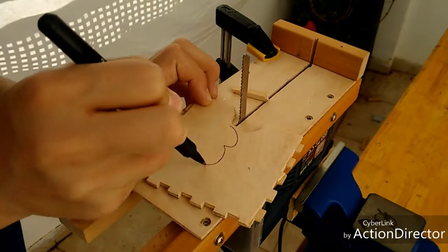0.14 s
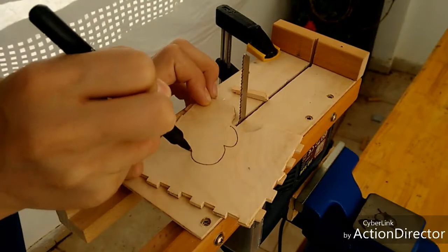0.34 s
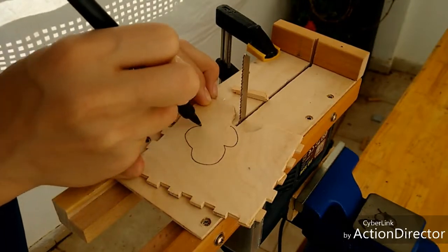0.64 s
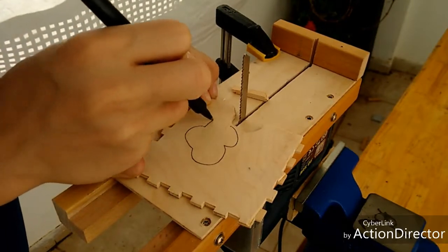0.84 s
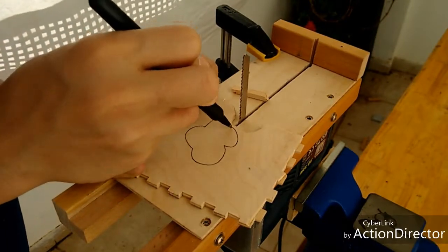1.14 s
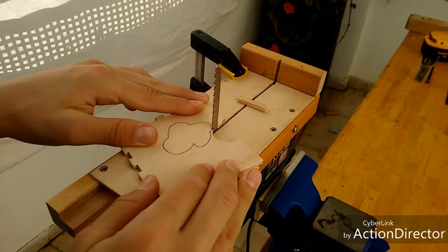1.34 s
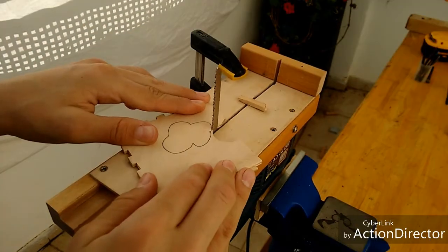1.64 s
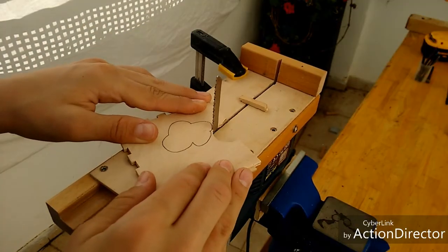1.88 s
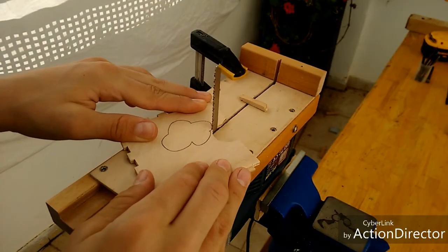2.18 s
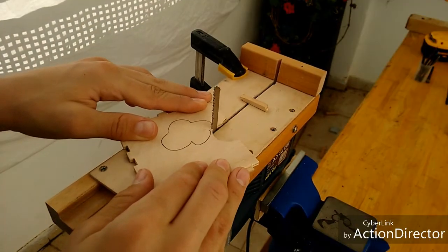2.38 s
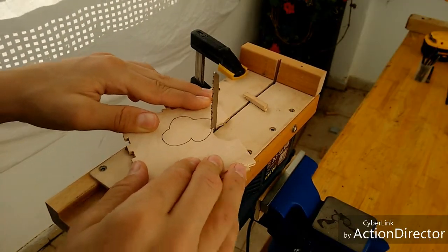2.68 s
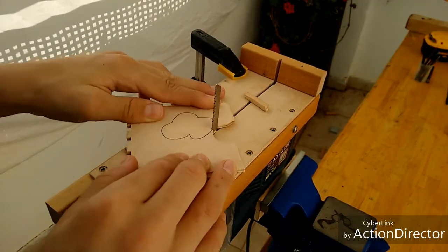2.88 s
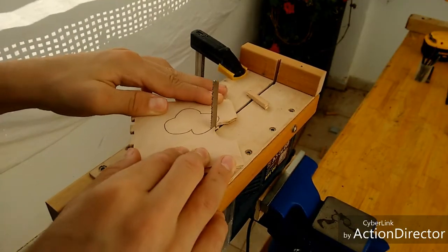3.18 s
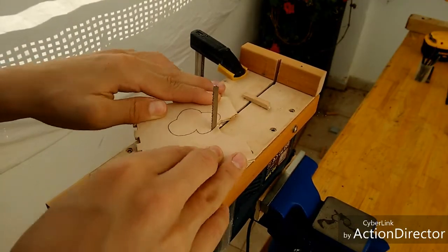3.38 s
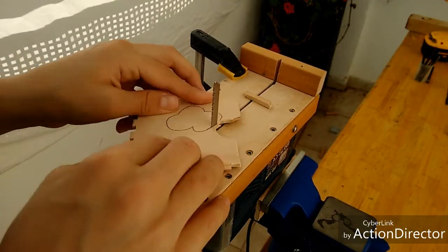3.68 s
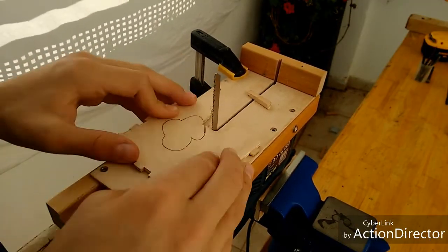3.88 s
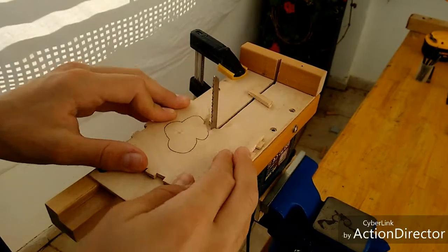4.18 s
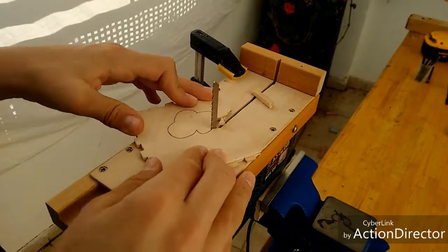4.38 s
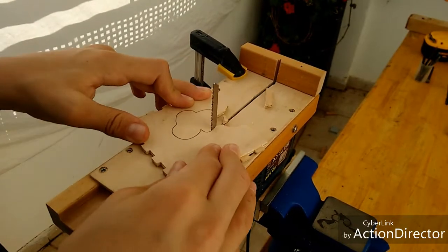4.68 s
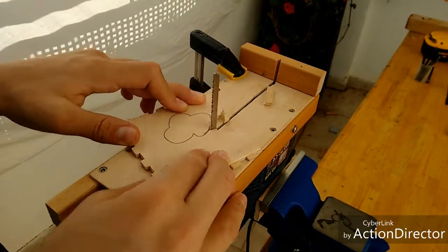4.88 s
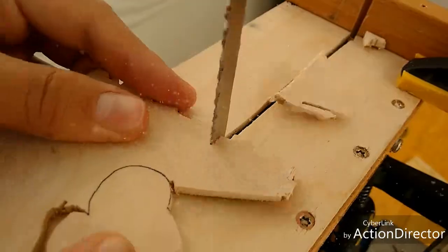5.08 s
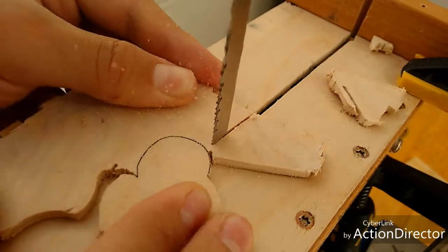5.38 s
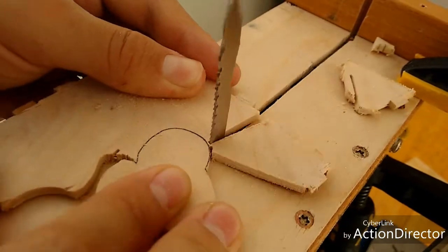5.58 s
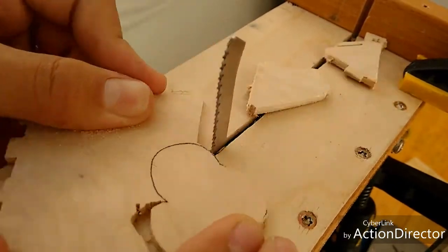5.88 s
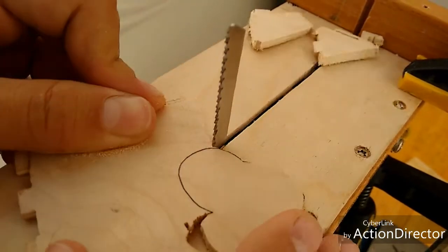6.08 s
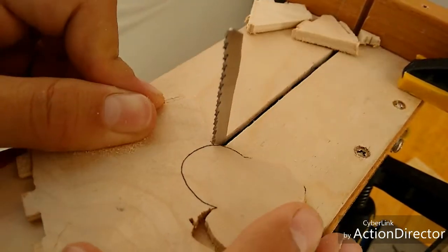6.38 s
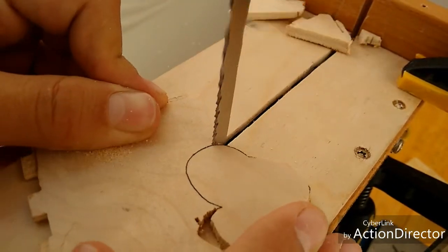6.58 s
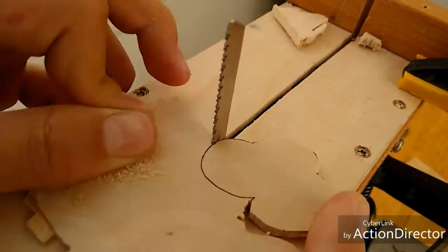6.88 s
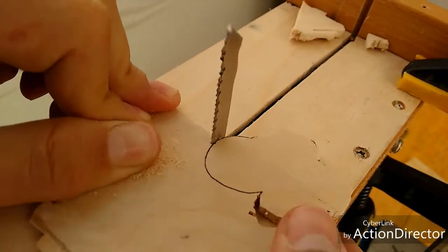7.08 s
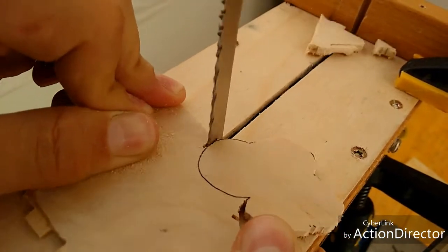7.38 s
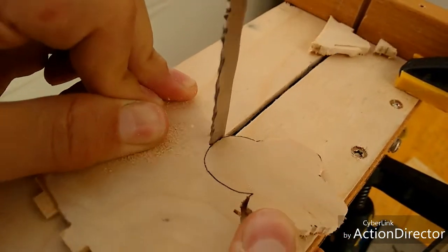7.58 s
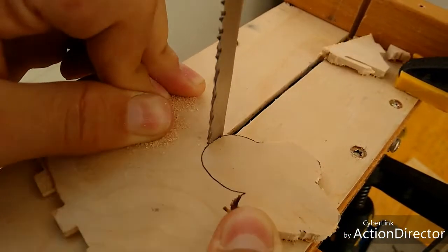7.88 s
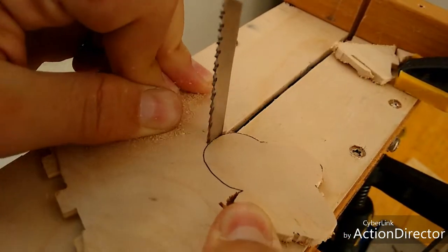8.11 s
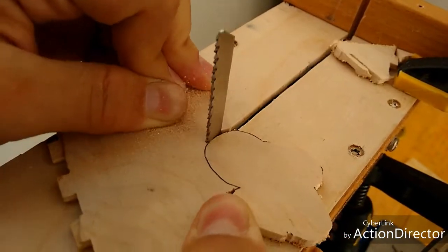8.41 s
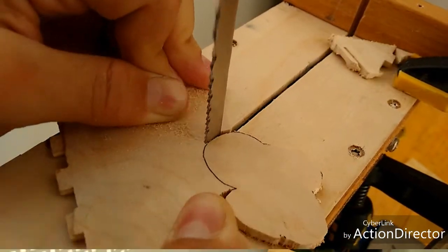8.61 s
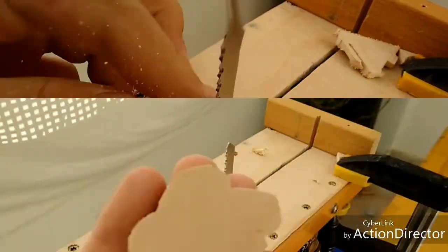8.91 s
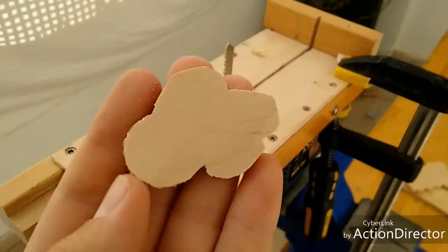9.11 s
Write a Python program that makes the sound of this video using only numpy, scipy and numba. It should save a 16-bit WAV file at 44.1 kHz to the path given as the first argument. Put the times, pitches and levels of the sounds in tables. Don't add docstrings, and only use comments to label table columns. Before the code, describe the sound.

Stereo phone microphone beside a table-mounted jigsaw. First come light pen ticks and thin squeaks over room air, then a steady woody rattle at natural speed. An abrupt change gives hurried sawing, a harsh buzz bending under load. The last cuts are nearer and louder, with nasal plywood ring, gritty teeth and sharp jams, before sudden near-silence with a thin insect shimmer outside.

```python
import sys
import numpy as np
from scipy import signal
from scipy.fft import rfft, irfft
from scipy.io import wavfile
from scipy.ndimage import uniform_filter1d
from numba import njit

SR = 44100
rng = np.random.default_rng(int(sys.argv[2]) if len(sys.argv) > 2 else 0)


def ratio_of_db(decibels):
    return 10 ** (np.asarray(decibels, float) / 20)


def log_audio(samples):
    frames = np.atleast_2d(samples).T
    limited = np.clip(frames, -1, 1)
    pcm = np.round(limited * 32767).astype(np.int16)
    wavfile.write(sys.argv[1], SR, pcm)


N = 407925


def unit(x):
    return x / np.sqrt(np.mean(x ** 2))


def colour(x, points, modes=(), lo_hz=1., hi_hz=1e5, turn=0.):
    hz = np.maximum(np.fft.rfftfreq(4096, 1 / SR), 1)
    point_hz, point_db = np.array(points).T
    db = np.interp(np.log(hz), np.log(point_hz), point_db)
    db = db + sum(gain / (1 + (2 * (hz - f) / width) ** 2) for f, width, gain in modes)
    band_loss = (1 + (lo_hz / hz) ** 12) * (1 + (hz / hi_hz) ** 12)
    db = np.maximum(db - 10 * np.log10(band_loss), -120)
    ceps = irfft(db * np.log(10) / 20)
    ceps[1:2048] *= 2
    ceps[2049:] = 0
    taps = np.roll(irfft(np.exp(rfft(ceps) + 1j * turn)), 64)
    return signal.fftconvolve(x, taps)[64:64 + len(x)]


def walk(size, rate):
    k = int(SR / rate)
    held = np.repeat(rng.standard_normal(size // k + 1), k)
    return uniform_filter1d(held, k)[:size]


def band_noise(size, hz, width):
    sos = signal.butter(2, [hz - width / 2, hz + width / 2], "band", fs=SR, output="sos")
    return signal.sosfilt(sos, rng.standard_normal(size))


# start in seconds, end in seconds, level in dB, side level in dB.
SHOP = [
    (0, 1.257, -46.5, -5),
    (8.951, 9.3, -47.5, -5.5),
]
# frequency in Hz, density in dB per Hz.
SHOP_MID = [
    [(24, -60.5), (40, -37), (109, -11), (497, -12.5), (638, -10), (861, -8.5), (975, -7), (1610, -8),
     (2170, -7.5), (3310, -8.5), (7930, -25), (9210, -32.5), (15600, -28.5)],
    [(15, -35.5), (25, -11), (156, -9.5), (496, -3), (921, -9.5), (1080, -9.5), (1170, -11), (1760, -27),
     (6500, -37.5), (8500, -34.5), (12200, -39), (14000, -38), (15600, -35.5)],
]
# frequency in Hz, density in dB per Hz.
SHOP_SIDE = [
    [(15, -35), (25, -6.5), (1080, -5.5), (1240, -4), (2120, -2), (4390, -16.5), (7520, -11.5),
     (15600, -30)],
    [(15, -37), (25, -9.5), (340, -5), (632, -6.5), (1080, -20), (2070, -12), (3350, -30), (15600, -31)],
]


def shop():
    out = np.zeros((2, N))
    for (start, end, db, side_db), mid, side in zip(SHOP, SHOP_MID, SHOP_SIDE):
        i, j = int(start * SR), min(int(end * SR), N)
        air = [unit(colour(rng.standard_normal(j - i), c)) for c in (mid, side)]
        swell_db = 0.16 * walk(size=j - i, rate=1.5) + 0.5 * walk(size=j - i, rate=19.0)
        out[:, i:j] = ratio_of_db(db + swell_db) * np.array([air[0], ratio_of_db(side_db) * air[1]])
    return out


# time in seconds, peak in dB, pitch in Hz, t60 in seconds.
TAPS = [
    (0.1316, -46, 2920, 0.021),
    (0.215, -33, 4260, 0.033),
    (0.2398, -30, 2700, 0.0097),
    (0.408, -39.5, 2300, 0.012),
    (0.7235, -41, 3500, .006),
    (0.759, -29, 3750, 0.025),
    (1.051, -31.5, 3750, 0.029),
]
# start in seconds, end in seconds, pitch in Hz, width in Hz, level in dB.
SQUEAKS = [
    (.225, .29, 2720, 130, -46),
    (.125, .165, 2920, 120, -52),
    (.12, .18, 2080, 150, -54),
    (.97, 1.22, 7350, 200, -62),
    (.83, .87, 4700, 300, -56),
    (.85, .96, 1850, 130, -54),
    (.99, 1.04, 2780, 120, -54),
    (.39, .45, 2200, 250, -54),
    (1.0, 1.07, 1900, 150, -56),
]


def pen():
    out, t = np.zeros(N), np.arange(4000) / SR
    for s, db, hz, t60 in TAPS:
        i = int(s * SR)
        crack = rng.standard_normal(len(t))
        strike = .5 * np.sin(2 * np.pi * hz * t) + .2 * np.gradient(crack) + .25 * crack
        out[i:i + len(t)] += ratio_of_db(db) * strike * 1000. ** (-t / max(t60, .004))
    for start, end, hz, width, db in SQUEAKS:
        i, j = int(start * SR), int(end * SR)
        rub = unit(band_noise(j - i, hz, width))
        out[i:j] += ratio_of_db(db + 5.0) * rub * signal.windows.tukey(j - i, .5)
    return np.array([out, 0.16 * out])


INERTIA_S = .03
GRIP_S, RETURN_SHARE = 0.0017, 0.57


def hands(t, pace, layers, moves):
    feed_db, bind_db = np.zeros((2, len(t)))
    for start, length, feed, bind in moves:
        fade = max(length * np.clip(RETURN_SHARE, .05, 1), GRIP_S)
        hold = np.clip(np.minimum((t - start) / GRIP_S, (start + length - t) / fade), 0, 1)
        feed_db = feed_db + feed * hold
        bind_db = bind_db + bind * hold
    hz = np.interp(t, *np.transpose(pace))
    hz = uniform_filter1d(hz, int(INERTIA_S * SR), mode="nearest")
    sag = 1 - hz / hz.mean()
    rasp_db, ring_db, drum_db = (db + share * feed_db + labour_db * sag for db, share, labour_db in layers)
    return hz, rasp_db + bind_db, ring_db, drum_db


@njit
def again(x, lag, share):
    y = np.sqrt(1 - share * share) * x
    for i in range(len(x)):
        if i >= lag[i]:
            y[i] += share * y[i - lag[i]]
    return y


def teeth(phase, bite):
    sharp, back_db, steady_db, share = bite
    size = len(phase)
    count = np.arange(size)
    grit = rng.standard_normal(size) * ratio_of_db(.8 * rng.exponential(size=size))
    stroke_before = np.interp(phase - 1, phase, count, left=-1)
    lag = np.round(count - stroke_before).astype(np.int64)
    grit = again(grit, lag, float(np.clip(share, 0, .97)))
    swing = np.cos(2 * np.pi * phase)
    half = np.floor(2 * phase + .5).astype(int)
    force = ratio_of_db(1.3 * rng.standard_normal(size))[half - half[0]]
    strokes = force * (np.exp(sharp * (swing - 1)) + ratio_of_db(back_db) * np.exp(-sharp * (swing + 1)))
    steady = .6 * grit + rng.standard_normal(size)
    return grit * strokes + ratio_of_db(steady_db) * steady


GEAR_LAG, GEAR_SIDE = .08, .3


def gearing(phase, gears, hz, modes, drum_hz, rattle_db, sway_db, slip=.3):
    mid, side = 0, 0
    for order, db in gears:
        angle = 2 * np.pi * order * (phase - GEAR_LAG) + slip * walk(size=len(phase), rate=hz.mean() / 3)
        lift_db = 1.9 * sum(gain / (1 + ((order * hz - f) / width) ** 2) for f, width, gain in modes)
        knock_db = rattle_db * (order * hz.mean() > drum_hz)
        sway = sway_db * walk(size=len(phase), rate=hz.mean() / 4)
        size = np.sqrt(2) * ratio_of_db(db + lift_db - lift_db.mean() + knock_db + sway)
        mid = mid + size * np.cos(angle)
        side = side + GEAR_SIDE * size * np.sin(angle)
    return np.array([mid, side])


KNOCK_RISE_S, KNOCK_SHARE, LOW_KNOCK_SHARE = .005, .95, .35
SING_DB = 6


def saw(pace, layers, moves, mid, side, modes, bites, setting, gears, spells=(), knocks=((0, 0),), sway_db=3):
    s = np.transpose(pace)[0]
    ring_hz, drum_hz, first, side_db, shared, turn = setting
    span = slice(int(s[0] * SR), int(s[-1] * SR))
    t = np.arange(N)[span] / SR
    hz, rasp_db, ring_db, drum_db = hands(t, pace, layers, moves)
    knock_db = np.interp(t - KNOCK_RISE_S, *np.transpose(knocks))
    knock_db = KNOCK_SHARE * (knock_db - knock_db.mean())
    ring_db = ring_db + knock_db
    drum_db = drum_db + LOW_KNOCK_SHARE * knock_db
    rattle_db = (1 - LOW_KNOCK_SHARE) * knock_db
    phase = np.cumsum(hz) / SR - (first - s[0]) * hz[0]
    bands = [(ring_hz, 1e5), (drum_hz, ring_hz), (1., drum_hz)]
    mix = np.clip(shared, 0, 1)
    mids, sides = [], []
    for bite, band in zip(bites, bands):
        push, other = teeth(phase, bite), teeth(phase, bite)
        mids.append(colour(push, mid, modes, *band))
        spread = mix * push + np.sqrt(1 - mix ** 2) * other
        sides.append(colour(spread, side, (), *band, turn))
    match = ratio_of_db(side_db) * np.std(sum(mids)) / np.std(sum(sides))
    out = np.zeros((2, N))
    sing = ratio_of_db(drum_db + SING_DB * (hz / hz.mean() - 1.5))
    out[:, span] = sing * gearing(phase, gears, hz, modes, drum_hz, rattle_db, sway_db)
    out[:, span] += chatter(t, phase, hz, spells)
    for m, d, db in zip(mids, sides, (rasp_db, ring_db, drum_db)):
        flutter = ratio_of_db(db + .8 * walk(size=len(hz), rate=25))
        out[:, span] += flutter * np.array([m, match * d]) / np.std(m)
    return out


# time in seconds, strokes per second.
SLOW_PACE = [(1.261, 23.15), (1.66, 23.12), (1.8, 22.7), (2.0, 22.63), (2.509, 22.62)]
# level in dB, share of feed change (0-1 or more), dB per unit of motor sag.
SLOW_LAYERS = [
    (-28.5, 0.74, 14),
    (-27.5, 1.5, -8),
    (-30.5, 0.72, 0),
]
# start in seconds, length in seconds, feed in dB, extra rasp of a binding blade in dB.
SLOW_HANDS = [
    (1.27, 0.15, 2.5, -1),
    (1.617, 0.3, 1, 1.5),
    (1.783, 0.18, -0.5, 1),
]
# frequency in Hz, density in dB per Hz.
SLOW_MID = [(18, -57), (30, -46), (152, -45), (243, -34.5), (432, -17), (657, -24.5), (923, 1),
            (1020, -4.5), (1330, -4), (2430, -32.5), (3150, -25.5), (4790, -29), (8520, -28),
            (13300, -35.5), (15600, -45.5)]
# frequency in Hz, density in dB per Hz.
SLOW_SIDE = [(18, -73), (30, -41), (284, -23.5), (432, -5), (640, -23), (923, -22), (1080, -5.5),
             (1770, 0.5), (3410, -13.5), (12000, -21), (15600, -22.5)]
# frequency in Hz, width in Hz, gain in dB.
SLOW_MODES = [(146, 13.4, 33), (2420, 180, -0.5), (4850, 340, -7), (7200, 770, -6.5), (9720, 770, -6.5)]
# sharpness, return stroke in dB, steady part in dB, share repeated next stroke (0-1).
SLOW_BITE = [
    (1.5, -2, -5, .1),
    (5, 0, -14, .65),
    (3, 0, -11, .85),
]
# ring top in Hz, drumming top in Hz, first bite in seconds, side in dB, shared side (0-1),
# side turn in radians.
SLOW_SET = (1900, 680, 1.275, -6, .9, 1.5)
SLOW_ORDERS = [5, 7, 17, 19, 21, 25, 38, 39, 40, 41, 43, 57, 59, 61]
SLOW_GEARS = [-29, -29, -12, -2, -1.5, -11, -10, 1, -18, 5.5, -8, -5, -1, -5]
# time in seconds, strength in dB.
SLOW_KNOCKS = [(1.27, -8), (1.296, -10), (1.318, -10), (1.339, -11), (1.361, -13), (1.381, -14),
               (1.404, -14), (1.426, -13), (1.448, -10), (1.468, -12), (1.493, -9), (1.513, -12),
               (1.535, -10), (1.555, -13), (1.575, -10), (1.601, -14), (1.623, -9), (1.641, -11),
               (1.66, -8), (1.686, -10), (1.708, -6), (1.728, -11), (1.751, -8), (1.776, -11), (1.797, -8),
               (1.817, -9), (1.84, -6), (1.863, -11), (1.883, -8), (1.906, -10), (1.928, -8), (1.951, -12),
               (1.971, -11), (1.993, -12), (2.015, -11), (2.037, -11), (2.058, -10), (2.082, -12),
               (2.103, -9), (2.126, -11), (2.147, -10), (2.171, -11), (2.193, -10), (2.215, -12),
               (2.235, -11), (2.259, -11), (2.28, -12), (2.306, -12), (2.326, -9), (2.348, -11),
               (2.369, -10), (2.394, -10), (2.415, -10), (2.439, -12), (2.461, -10), (2.481, -12),
               (2.503, -11)]


def slow_cut():
    gears = zip(SLOW_ORDERS, SLOW_GEARS)
    return saw(SLOW_PACE, SLOW_LAYERS, SLOW_HANDS, SLOW_MID, SLOW_SIDE, SLOW_MODES, SLOW_BITE, SLOW_SET,
               gears, knocks=SLOW_KNOCKS, sway_db=3.1)


CHATTER_WIDTH, CHATTER_SIDE = .15, .3


def chatter(t, phase, hz, spells, jitter_s=9e-6, detune=.012, scatter_db=1.8):
    out = np.zeros(len(t))
    for start, length, mode_hz, db, back_db in spells:
        on = slice(*np.searchsorted(t, [start, start + length]))
        bite = np.floor(2 * phase[on]).astype(int)
        late, tune, size = rng.standard_normal((200, 3))[bite - bite[0]].T
        since = np.maximum((phase[on] - bite / 2) / hz[on] - jitter_s * (3 + late), 0)
        decay = np.pi * CHATTER_WIDTH * mode_hz * since
        ring = decay * np.exp(-decay) * np.sin(2 * np.pi * mode_hz * (1 + detune * tune) * since)
        ring = ring * ratio_of_db(back_db * (bite % 2) + scatter_db * size)
        out[on] += ratio_of_db(db) * unit(ring) * signal.windows.tukey(len(ring), .4)
    return np.array([out, CHATTER_SIDE * out])


# time in seconds, strokes per second.
FAST_PACE = [(2.51, 180), (2.63, 177), (2.8, 163.5), (2.865, 150), (2.92, 166), (3.02, 180), (3.15, 176),
             (3.42, 139), (3.55, 104), (3.66, 136), (3.75, 166), (3.81, 169), (3.9, 188), (4.06, 197.5),
             (4.24, 166), (4.3, 182), (4.45, 189), (4.68, 138), (4.92, 109), (5.01, 100)]
# level in dB, share of feed change (0-1 or more), dB per unit of motor sag.
FAST_LAYERS = [
    (-26.5, 1.15, 1),
    (-29, 0.86, 3.5),
    (-48, 0.78, 9.3),
]
# start in seconds, length in seconds, feed in dB, extra rasp of a binding blade in dB.
FAST_HANDS = [(2.658, 0.25, -2.5, 1.5), (2.88, 0.078, -8, 1.5), (2.971, 0.15, -2, 7), (3.25, 0.24, 1, 3.5),
              (3.46, 0.39, 0, -3.5), (3.609, 0.059, -8.5, 1.5), (3.78, 0.093, -3.5, 1),
              (3.899, 0.092, 5.5, -5), (4.06, 0.084, -3.5, 3), (4.245, 0.064, -6, -1),
              (4.37, 0.037, -4, -1.5), (4.42, 0.077, -2, 9), (4.57, 0.069, 4, -0.5), (4.8, 0.18, -2, -2.5),
              (4.955, 0.071, -6.5, -0.5)]
# frequency in Hz, density in dB per Hz.
FAST_MID = [(35, -71), (60, -33), (226, -23), (404, -23.5), (739, -13), (830, -19), (977, -1.5),
            (1100, -11.5), (1200, -6), (1630, -23.5), (2910, -13.5), (5340, -11), (7560, 4.5),
            (15600, -6.5)]
# frequency in Hz, density in dB per Hz.
FAST_SIDE = [(35, -86), (60, -29), (811, -18), (1200, 0.5), (2060, -32.5), (2720, -18), (4640, -12.5),
             (9770, -16), (12000, -2), (15600, -1.5)]
# frequency in Hz, width in Hz, gain in dB.
FAST_MODES = [(970, 46, 5), (1205, 70, 8), (3003, 47, 9), (3650, 39, 6.5), (6300, 200, 3), (7600, 120, 5),
              (8800, 150, 5)]
# sharpness, return stroke in dB, steady part in dB, share repeated next stroke (0-1).
FAST_BITE = [
    (5, -6, -12, .74),
    (2.5, -3, -10, .78),
    (1.5, -6, -8, .74),
]
# ring top in Hz, drumming top in Hz, first bite in seconds, side in dB, shared side (0-1),
# side turn in radians.
FAST_SET = (5191, 1899, 2.5, -7.5, 0.55, 1.5)
FAST_ORDERS = [5, 6, 7, 8, 9, 10, 11, 18, 20, 21, 23, 40, 60.5]
FAST_GEARS = [-10, -16, -2.5, -11, -14, -19, -22, -8, -11, -3, -8, 1, 0]
# start in seconds, length in seconds, pitch in Hz, level in dB, return stroke in dB.
FAST_CHATTER = [(2.494, 0.22, 7370, -29, -2), (2.517, 0.24, 3640, -38, 5), (2.79, 0.11, 7800, -34, 10),
                (2.967, 0.13, 7700, -31, -11), (2.97, 0.36, 8900, -27.5, 3), (3.125, 0.19, 3010, -33.5, -4),
                (3.4, 0.17, 2910, -33, 9), (3.642, 0.11, 6700, -32, 0.5), (3.86, 0.13, 6100, -35, 6),
                (3.86, 0.11, 3580, -41, -8), (4.04, 0.21, 7470, -24, -2.5), (4.121, 0.1, 8600, -28, -3),
                (4.143, 0.093, 6600, -32.5, -3), (4.32, .05, 7360, -30, 2.5),
                (4.396, 0.081, 7500, -26.5, -2), (4.42, 0.078, 8950, -39.5, -2.5),
                (4.507, 0.095, 8850, -34, 0), (4.498, 0.38, 2920, -37.5, 12), (4.55, 0.082, 7650, -37.5, 0),
                (4.682, 0.19, 7450, -53, -5), (4.684, 0.13, 6340, -40, -9.5), (4.836, .12, 2940, -35.5, -2)]


def fast_cut():
    gears = zip(FAST_ORDERS, FAST_GEARS)
    return saw(FAST_PACE, FAST_LAYERS, FAST_HANDS, FAST_MID, FAST_SIDE, FAST_MODES, FAST_BITE, FAST_SET,
               gears, FAST_CHATTER, sway_db=3.5)


# time in seconds, strokes per second.
CLOSE_PACE = [(5.012, 150.6), (5.051, 150.4), (5.187, 141.1), (5.287, 137.4), (5.4, 134.6), (5.591, 141.6),
              (5.859, 148.9), (6.143, 151.6), (6.3, 150.2), (6.79, 146.2), (6.88, 139), (6.92, 144)]
# level in dB, share of feed change (0-1 or more), dB per unit of motor sag.
CLOSE_LAYERS = [
    (-24.5, 1.2, 2.5),
    (-22.5, 1.12, -2.5),
    (-34, 0.44, -59),
]
# start in seconds, length in seconds, feed in dB, extra rasp of a binding blade in dB.
CLOSE_HANDS = [
    (5.0, 0.021, -4, -2.5),
    (5.13, 0.22, -1, 1.5),
    (5.44, 0.28, -2, -1.5),
    (5.563, 0.074, -6.5, 1),
    (5.72, 0.33, -2.5, 2.5),
    (5.94, 0.25, -4, 2.5),
    (6.087, 0.15, -4, 2.5),
    (6.2, 0.3, 0, 1.5),
    (6.857, 0.031, -3, 1.5),
    (6.879, 0.11, -10, 0),
]
# frequency in Hz, density in dB per Hz.
CLOSE_MID = [(35, -68), (60, -35), (395, -21), (443, -13), (614, -14.5), (674, -16.5), (890, -8.5),
             (955, -11), (1450, 0.5), (2100, -4), (3430, 6), (8300, -23), (15600, -22.5)]
# frequency in Hz, density in dB per Hz.
CLOSE_SIDE = [(35, -54.5), (60, -22), (1200, 6), (2780, 5), (4230, 0.5), (4860, -39), (5590, -12),
              (6580, -3), (10200, -7), (15600, -20)]
# frequency in Hz, width in Hz, gain in dB.
CLOSE_MODES = [(1496, 36, 5.3), (2790, 40, 5.7), (3190, 23, 2.1), (3220, 21, 1.9), (4270, 460, 5.1),
               (15000, 900, 1.9)]
# sharpness, return stroke in dB, steady part in dB, share repeated next stroke (0-1).
CLOSE_BITE = [
    (4.5, -6, -8, .4),
    (3, -4, -10, .75),
    (2.5, -4, -12, .86),
]
# ring top in Hz, drumming top in Hz, first bite in seconds, side in dB, shared side (0-1),
# side turn in radians.
CLOSE_SET = (5490.5, 2102, 5.0035, -8.5, 0.23, 1.06)
CLOSE_ORDERS = [3, 5, 8, 10, 19, 20, 21, 22, 23, 94.2]
CLOSE_GEARS = [-20, -22, -12, -4.5, -8, -12, -9, -11, -23, -20]
# start in seconds, length in seconds, pitch in Hz, level in dB, return stroke in dB.
CLOSE_CHATTER = [(5.011, 0.03, 1500, -26.5, -0.5), (5.025, 0.19, 2900, -24.5, -44),
                 (5.025, 0.054, 4440, -25, -18), (5.091, 0.073, 3400, -32.5, -15),
                 (5.3, 0.078, 4200, -26.5, -7.5), (5.39, 0.11, 2770, -24, 6.5),
                 (5.47, 0.1, 2810, -24, -6.5), (5.5, 0.074, 4160, -24.5, -14), (5.63, 0.11, 2900, -27, 9),
                 (5.82, 0.1, 1500, -28.5, -2.5), (5.84, 0.068, 3220, -52.5, -2),
                 (6.16, 0.14, 3210, -23, -5), (6.301, 0.23, 3300, -27.5, 3), (6.5, 0.26, 3930, -28.5, 5),
                 (6.58, 0.23, 3240, -27, 6), (6.72, 0.085, 3580, -23, 13), (6.801, 0.056, 4040, -24, -13.5),
                 (5.07, .23, 14600, -34.5, -25), (5.07, 0.25, 11700, -36, -25),
                 (5.04, 0.28, 8700, -41.5, -27)]


def close_cut():
    gears = zip(CLOSE_ORDERS, CLOSE_GEARS)
    return saw(CLOSE_PACE, CLOSE_LAYERS, CLOSE_HANDS, CLOSE_MID, CLOSE_SIDE, CLOSE_MODES, CLOSE_BITE, CLOSE_SET,
               gears, CLOSE_CHATTER, sway_db=2.0)


# first jolt in seconds, length in seconds, dip in dB, rebound in dB.
JAMS = [(5.0434, 0, -45, -14), (5.0777, 0, -7.5, -46), (5.1323, 0, -13.5, -9.5), (5.1463, .014, -10, -34),
        (5.1812, 0, -2, -9.5), (5.1956, 0, -6.5, -41), (5.2168, 0, -26.5, -11), (5.2308, .007, -9, -52),
        (5.2595, 0, -37, -8.5), (5.2698, 0, -34.5, -9.5), (5.2817, 0, -7, -41), (5.3619, 0, -11, -45.5),
        (6.8556, .021, -12, -19), (6.9677, .008, -6, -17), (7.0609, 0, -11, -13.5), (7.405, .016, -24, -13),
        (7.7943, .008, -14, -16), (8.7754, 0, -7, -33), (8.784, .009, -18, -9), (8.8012, 0, -6, -43),
        (8.8178, 0, -9.5, -55), (8.8863, 0, -47, -14.5), (8.9096, .008, -8, -20), (8.9238, .014, -8, -13)]


def jammed():
    rows = []
    for first, length, dip_db, rebound_db in JAMS:
        period = 1 / np.interp(first, *np.transpose([*CLOSE_PACE, *LATE_PACE]))
        jolt_count = 1 + int(round(length / period))
        rows += [(first + k * period, dip_db, rebound_db) for k in range(jolt_count)]
    return rows


def jolts(dip_s=.00018, rebound_s=.0006, mid_share=.27, clack=1.15, clack_hz=3000, clack_s=.00017):
    t = np.arange(-40, 300) / SR
    after = np.maximum(t, 0)
    dip = -np.exp(-((t + dip_s) / dip_s) ** 4)
    rebound = np.exp(-after / rebound_s) * (1 - np.exp(-after / 5e-5))
    throw, ring = np.zeros((2, N))
    for s, dip_db, rebound_db in jammed():
        detune, size = rng.standard_normal(2)
        i = int(s * SR) - 40
        throw[i:i + len(t)] += ratio_of_db(1.5 * size) * (ratio_of_db(dip_db) * dip + ratio_of_db(rebound_db) * rebound)
        blade = np.sin(2 * np.pi * clack_hz * (1 + 0.4 * detune) * after) * np.exp(-after / clack_s)
        ring[i:i + len(t)] += clack * ratio_of_db(min(dip_db, -7) + 2.9 * size) * blade
    return np.array([mid_share * throw + ring, throw + 0.34 * ring])


# time in seconds, strokes per second.
LATE_PACE = [(6.92, 144), (6.99, 139.5), (7.19, 136.2), (7.34, 138), (7.43, 129), (7.5, 141), (7.57, 143),
             (7.73, 138.6), (7.86, 127.2), (8.0, 128.8), (8.15, 119), (8.28, 134.2), (8.38, 140),
             (8.6, 140), (8.7, 132), (8.79, 117), (8.944, 145)]
# level in dB, share of feed change (0-1 or more), dB per unit of motor sag.
LATE_LAYERS = [
    (-27, 1, 2.2),
    (-26, 0.74, 2.5),
    (-32, 0.85, 24),
]
# start in seconds, length in seconds, feed in dB, extra rasp of a binding blade in dB.
LATE_HANDS = [(6.9, 0.084, -9.5, 1.5), (6.978, 0.099, -11, 1.5), (7.071, 0.096, -11.5, 3),
              (7.16, 0.15, -3, 1.5), (7.29, .06, -0.5, 3), (7.424, 0.2, -11.5, 3.5), (7.82, 0.14, -5.5, 0),
              (8.01, 0.054, 6, -3.5), (8.171, 0.18, -5, 3.5), (8.47, 0.14, -6, 2.5), (8.678, 0.11, 2.5, 0),
              (8.82, 0.11, -8.5, 3)]
# frequency in Hz, density in dB per Hz.
LATE_MID = [(35, -59), (60, -60), (320, -28.5), (368, -23.5), (443, -25.5), (600, -19.5), (739, -18),
            (1520, -7), (2540, -7.5), (4230, -4), (8690, -27.5), (12900, -25), (15600, -37.5)]
# frequency in Hz, width in Hz, gain in dB.
LATE_MODES = [(1500, 27, 8.5), (3480, 900, 4.5), (4260, 150, 7.7), (14750, 1900, 9.1)]
# sharpness, return stroke in dB, steady part in dB, share repeated next stroke (0-1).
LATE_BITE = [
    CLOSE_BITE[0],
    (5, -8, -13, .8),
    (5, -9, -13, .85),
]
# ring top in Hz, drumming top in Hz, first bite in seconds, side in dB, shared side (0-1),
# side turn in radians.
LATE_SET = (5509, 2093, 6.9183, -6.5, 0.37, 1.35)
LATE_GEARS = [-36.5, -19.5, -20, -14, -17, -13, -17, -18, -16.5, -14]
# start in seconds, length in seconds, pitch in Hz, level in dB, return stroke in dB.
LATE_CHATTER = [(7.0, 0.03, 3760, -35, -15), (7.045, 0.027, 3430, -27, -4), (7.2, 0.086, 2870, -32, 3),
                (7.3, 0.045, 2960, -25.5, -1), (7.35, .075, 4280, -45, -14), (7.62, 0.075, 4350, -27.5, 4),
                (7.72, 0.075, 3960, -26.5, -14), (7.98, 0.064, 4370, -29, -1),
                (8.02, 0.096, 1500, -34.5, -6), (8.05, 0.1, 3480, -33, 9), (8.2, 0.08, 4250, -27, 8),
                (8.34, 0.24, 4160, -27.5, 4), (8.59, 0.11, 3620, -25.5, -1.5),
                (8.61, 0.13, 1500, -30, -8.5), (8.7, 0.072, 4250, -23.5, -11),
                (8.78, 0.097, 3950, -28.5, -14.5), (8.85, 0.086, 3310, -29, -7),
                (7.34, 0.097, 1306, -33, -23), (7.72, 0.19, 1232, -36, -23), (8.75, .08, 13600, -44, -27),
                (8.88, 0.074, 13900, -37, -25), (8.88, .064, 10500, -44, -25)]


def late_cut():
    gears = zip(CLOSE_ORDERS, LATE_GEARS)
    return saw(LATE_PACE, LATE_LAYERS, LATE_HANDS, LATE_MID, CLOSE_SIDE, LATE_MODES, LATE_BITE, LATE_SET,
               gears, LATE_CHATTER)


# start in seconds, pitch in Hz, width in Hz, throbs per second, level in dB.
INSECT = (8.949, 13900, 1100, 23.5, -70)


def insect():
    start, hz, width, rate, db = INSECT
    t = np.arange(N) / SR - start
    hiss = band_noise(N, hz, width)
    throb = np.cos(np.pi * (rate * t + .1 * walk(size=N, rate=12))) ** 4
    out = ratio_of_db(db) * unit(hiss * throb) * (t > 0)
    return np.array([out, 0.35 * out])


def scene():
    cuts = slow_cut() + fast_cut() + close_cut() + late_cut()
    mid, side = shop() + pen() + cuts + jolts() + insect()
    return np.array([mid + side, mid - side])


def band_limit(x):
    return signal.sosfilt(signal.butter(12, 15620, fs=SR, output="sos"), x)


def record(dry):
    mix = np.clip(dry, -1, 1)
    return band_limit(mix)


dry = scene()
out = record(dry)
log_audio(out)
```